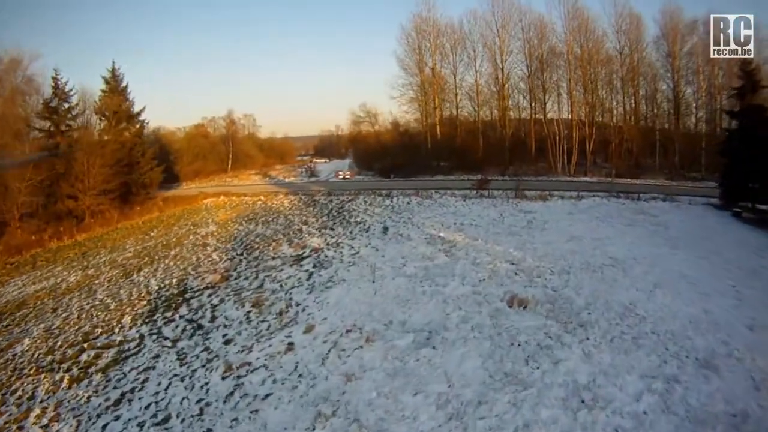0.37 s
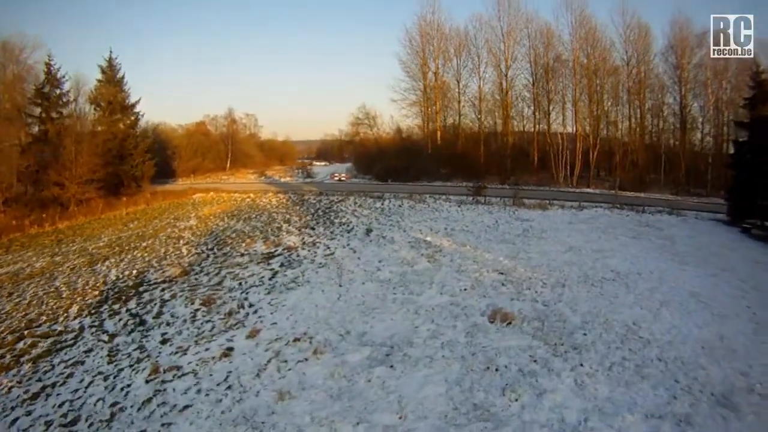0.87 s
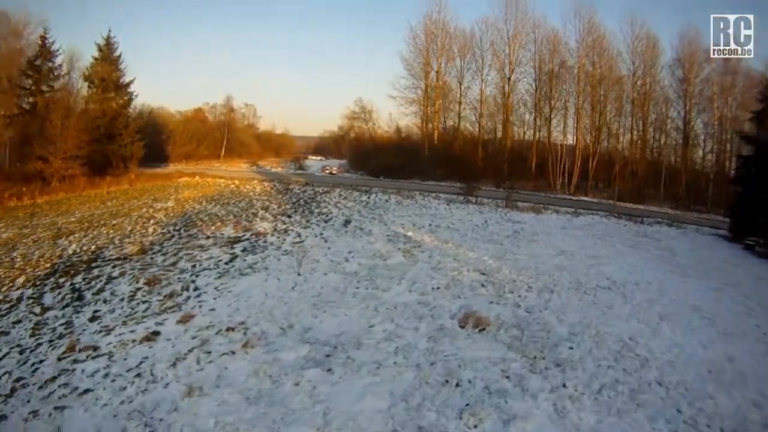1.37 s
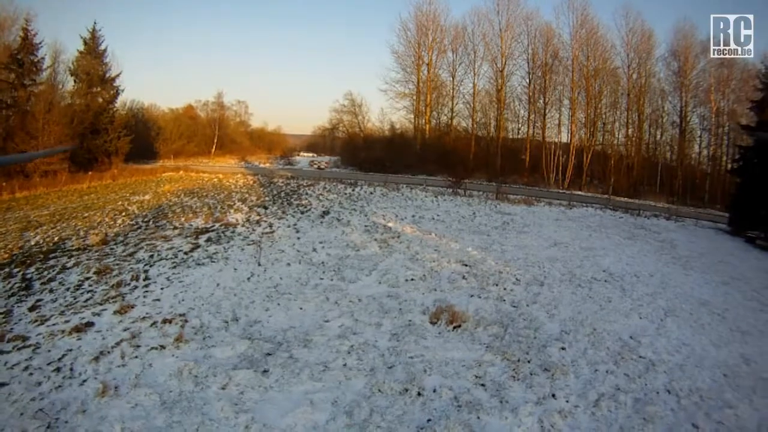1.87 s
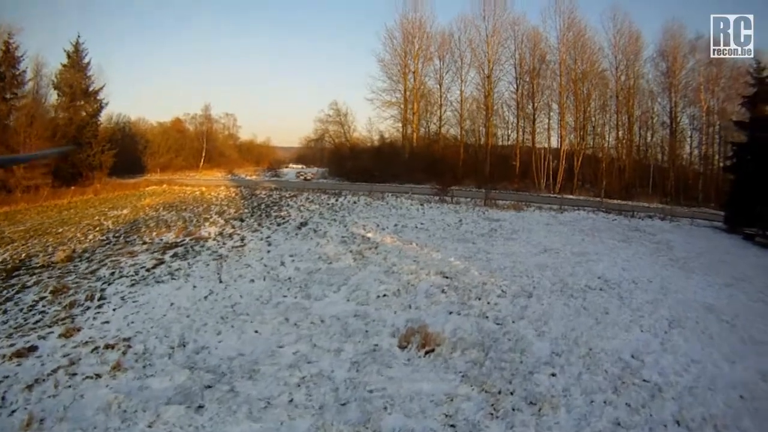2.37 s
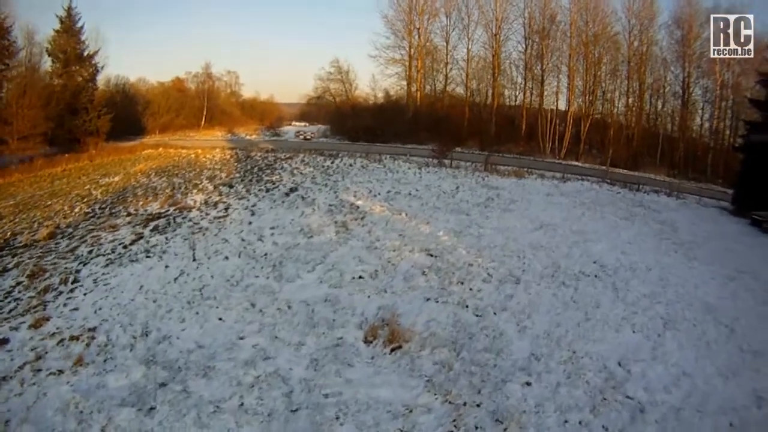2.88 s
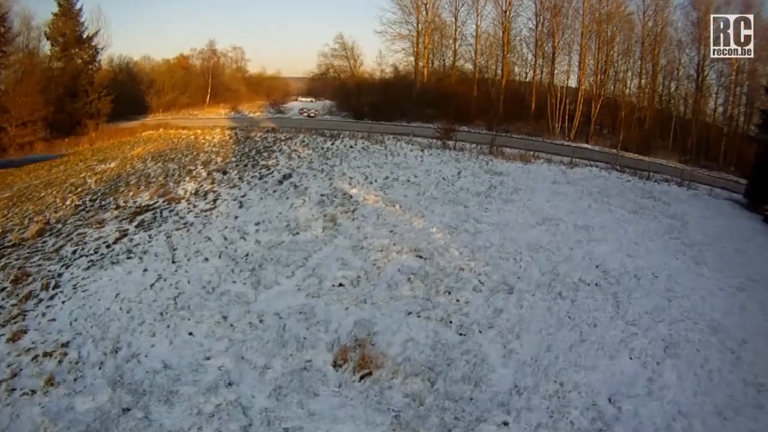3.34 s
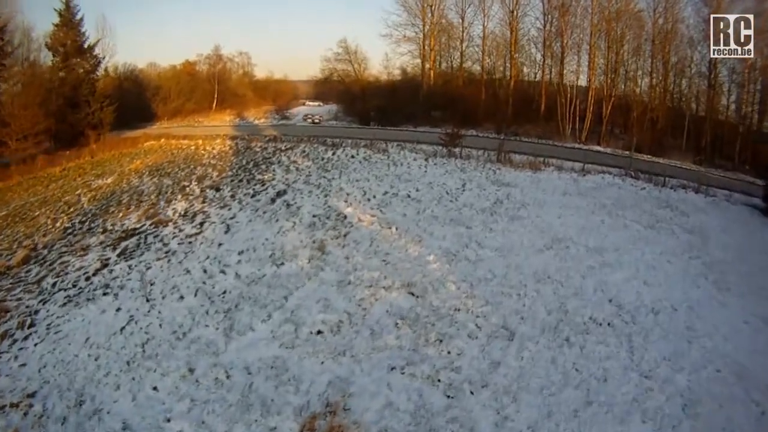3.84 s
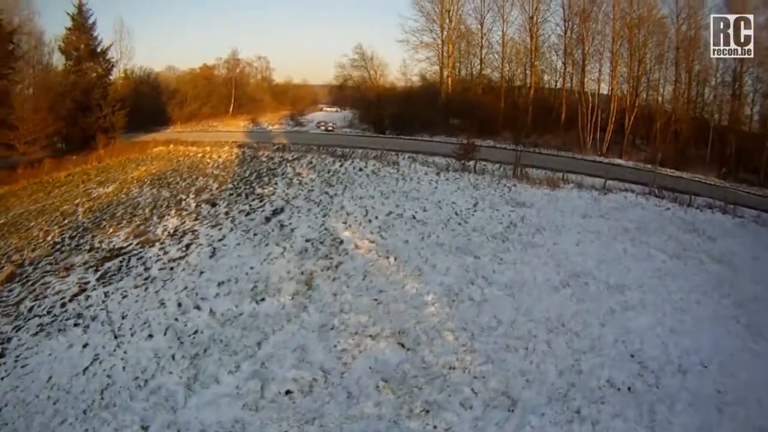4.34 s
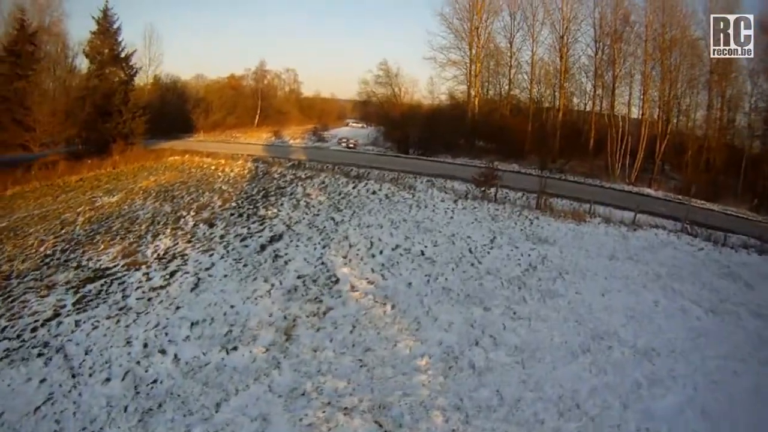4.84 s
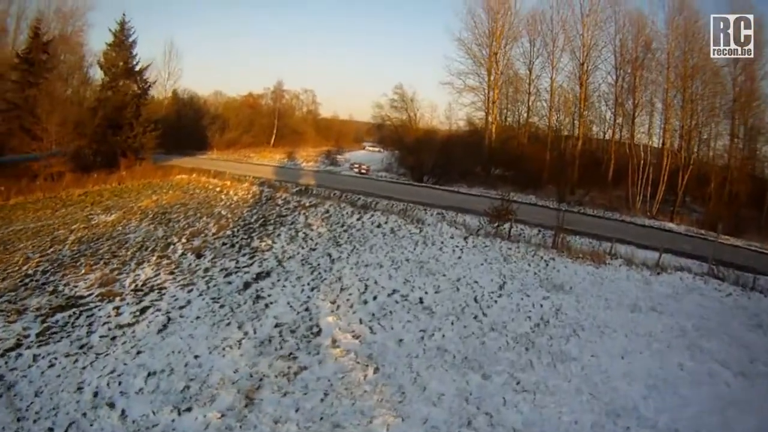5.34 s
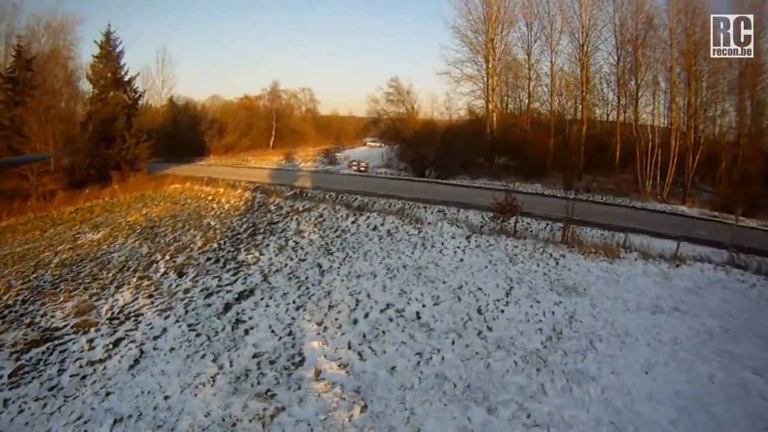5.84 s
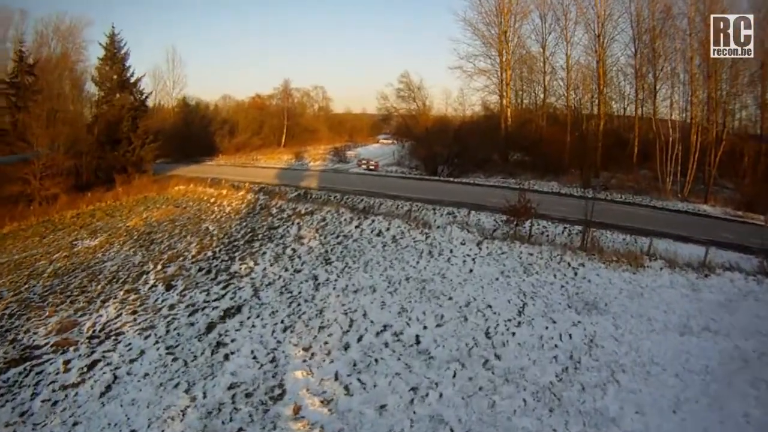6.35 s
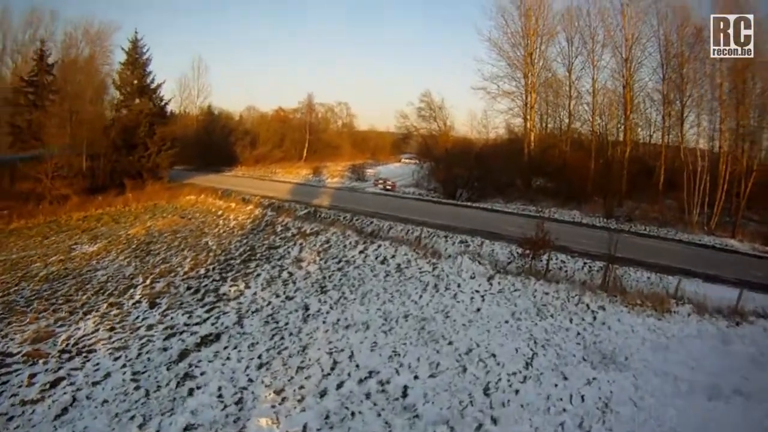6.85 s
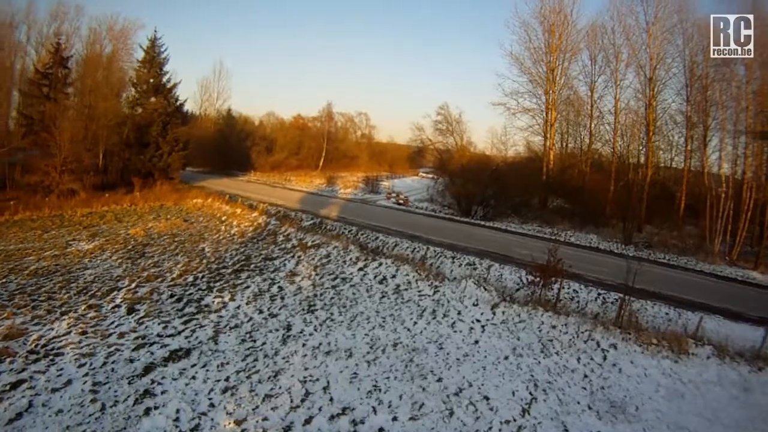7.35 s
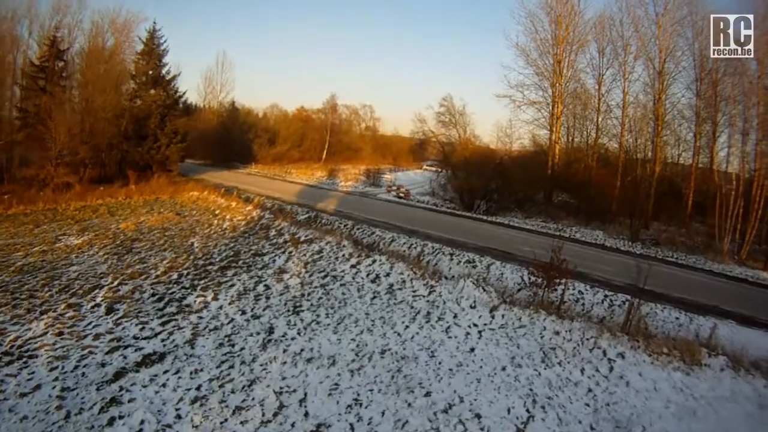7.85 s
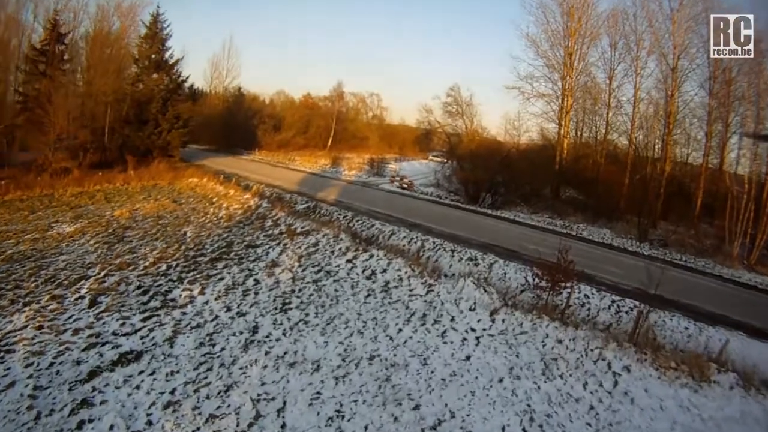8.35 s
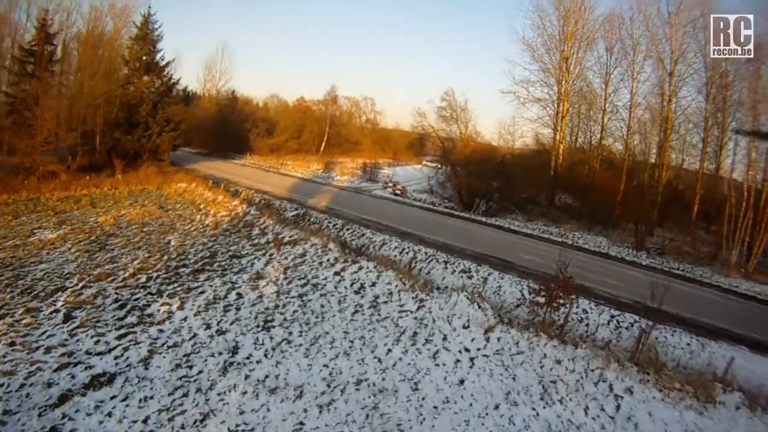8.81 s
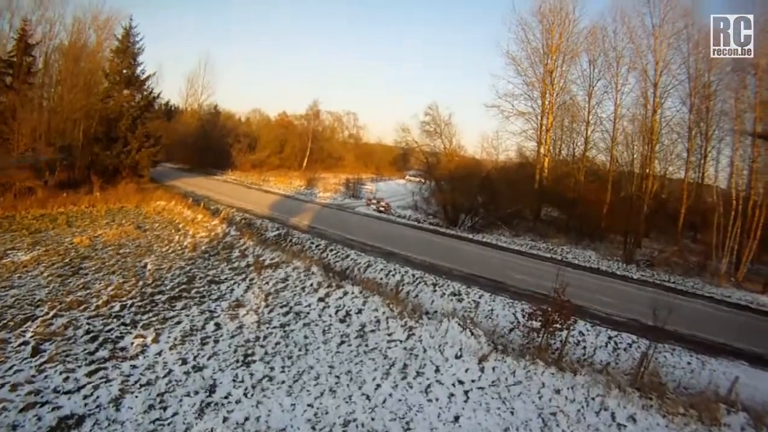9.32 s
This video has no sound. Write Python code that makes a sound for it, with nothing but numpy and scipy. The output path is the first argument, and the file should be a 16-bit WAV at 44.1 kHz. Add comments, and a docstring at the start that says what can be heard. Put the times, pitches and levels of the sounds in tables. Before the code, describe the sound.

A small camera drone flies low over an open snowy field, heard from a microphone on its body. Several propeller motors hum at nearly equal pitches, beating together, with a gritty frame buzz, ticking case rattle and electric whine. Wind thumps and pops between about one and two seconds; pitch climbs, drops near three seconds, then stays nearly level to the end.

```python
"""On the frame of a flying drone, with the microphone of a small camera riding along: three motors at nearly
equal speeds thrum and beat at low shaft orders, and their 14 magnet poles whine. The middle motor
knocks the frame once a turn and the frame rings; the case ticks on the peaks of the shaking. A low rumble
lies beneath, and gusts and pops of wind buffet the microphone. Gain control holds the loud moments down;
the sound is sampled at 12 kHz and held, which mirrors the spectrum upward."""
import sys
import numpy as np
from scipy import signal
from scipy.fft import rfft, irfft
from scipy.io import wavfile
from scipy.ndimage import uniform_filter1d

SR = 44100
rng = np.random.default_rng(int(sys.argv[2]) if len(sys.argv) > 2 else 0)


def file_out(sig):
    """Save sig as 16-bit WAV at sys.argv[1]."""
    # one column per channel
    cols = np.atleast_2d(sig).T
    # limit, then scale
    lim = np.clip(cols, -1, 1)
    pcm = np.round(lim * 32767).astype(np.int16)
    wavfile.write(sys.argv[1], SR, pcm)


def nominal_scale(level):
    """Amplitude ratio for a level in decibels (scalar or array-like)."""
    x = np.asarray(level, float) / 20
    return 10 ** x


N = 427750  # samples


def evened(x):
    """Scales a signal to rms 1."""
    return x / np.sqrt(np.mean(x ** 2) + 1e-20)


def curves(rows):
    """Straight lines between the rows of a table whose first column is time in seconds."""
    time_s, *columns = np.transpose(rows)
    return np.array([np.interp(np.arange(N) / SR, time_s, column) for column in columns])


def slow(top_hz):
    """Slow random wavering of rms 1: chance values joined by lines, 2 * top_hz of them a second."""
    knots = rng.standard_normal(400)
    return evened(np.interp(np.arange(N) / SR * 2 * top_hz, np.arange(400), knots))


def coloured(points):
    """Noise of rms 1 whose spectrum runs through points of (hz, level_db)."""
    points_hz, points_db = np.transpose(points)
    hz = np.fft.rfftfreq(N, 1 / SR)
    gain = nominal_scale(np.interp(np.log(hz + 1), np.log(points_hz), points_db))
    return evened(irfft(rfft(rng.standard_normal(N)) * gain, N))


def ring(x, modes):
    """Parallel resonances of (hz, width_hz, level_db), each applied twice for dark valleys; rms 1."""
    out = 0
    for k, (hz, width_hz, db) in enumerate(modes):
        b, a = signal.iirpeak(hz, hz / (1.57 * width_hz), SR)  # wider, as two passes narrow it
        once = signal.lfilter(b, a, x)
        twice = signal.lfilter(b, a, once)
        out = out + (-1) ** k * nominal_scale(db) * twice
    return evened(out)


def wind():
    """Turbulence on the microphone: lumpy low noise; each gust rises and falls at its own rate."""
    # gusts on the microphone: time_s of the height, level_db, rise_db_per_s, fall_db_per_s
    gust_table = [(0.0, -49, 73, 21), (0.76, -28, 150, 25), (1.0, -25.5, 60, 30), (1.25, -28, 28, 10),
                  (3.62, -38, 80, 120), (4.14, -42, 25, 42)]
    # spectrum of the wind noise: hz, level_db
    wind_spectrum = [(12, -28), (25, -3), (60, -3.5), (130, -1.5), (220, -6.5), (300, -10), (420, -18.5),
                     (600, -29), (900, -59)]
    lumps_db, calm_db = 3, -60
    long_gust, end_s, end_db_per_s = 3, 1.93, 102  # the long gust drops away
    t = np.arange(N) / SR
    gusts_db = np.array([db - np.where(t < s, rise * (s - t), fall * (t - s))
                         for s, db, rise, fall in gust_table])
    gusts_db[long_gust] -= end_db_per_s * np.maximum(t - end_s, 0)
    level_db = np.maximum(gusts_db.max(0), calm_db) + lumps_db * slow(18)
    return nominal_scale(level_db) * coloured(wind_spectrum)


def pops():
    """Single pops of wind: each is one pull and push of the microphone's membrane."""
    # pops: time_s of the middle, level_db of the sine before its envelope
    pop_table = [(0.769, -16), (0.787, -15.5), (0.861, -9.5), (1.089, -14), (1.26, -11.5), (1.327, -16.5),
                 (1.385, -18), (1.408, -10)]
    pop_hz, length_s = 150, 0.003
    t, out = np.arange(N) / SR, np.zeros(N)
    for s, db in pop_table:
        envelope = np.exp(-((t - s) / length_s) ** 2)
        out += nominal_scale(db) * np.sin(2 * np.pi * pop_hz * (t - s)) * envelope
    return out


def rumble():
    """Low coloured noise beneath the motors, unsteady in level."""
    # spectrum of the rumble: hz, level_db
    rumble_spectrum = [(15, -44), (45, -31), (65, -9), (100, -26.5), (140, -2.5), (172, -13.5), (205, -2),
                       (240, -6), (275, -3.5), (325, -21), (600, -20.5), (1000, -40)]
    level_db, waver_db = -37.5, 2.5
    return nominal_scale(level_db + waver_db * slow(6)) * coloured(rumble_spectrum)


def case(thrum):
    """The loose case ticks when a peak of the shaking closes its gap, and chatters as the shaking swells."""
    # resonances of the case: hz, width_hz, level_db
    case_modes = [(3520, 140, 0.5), (4650, 630, 4)]
    gap, tick_s = 0.57, 0.00053  # gap in rms of the thrum, decay time of a tick
    scatter_db, chatter_db = 3.3, -5
    shaking = evened(thrum)
    at = signal.find_peaks(shaking, height=gap)[0]
    ticks = np.zeros(N)
    ticks[at] = np.sqrt(shaking[at] - gap) * nominal_scale(scatter_db * rng.standard_normal(len(at)))
    decay = signal.lfilter([1], [1, -np.exp(-1 / (tick_s * SR))], ticks)
    bursts = decay * rng.standard_normal(N)
    swell = uniform_filter1d(abs(thrum), size=2000) ** 1.5
    chatter = evened(swell * rng.standard_normal(N))
    return ring(evened(bursts) + nominal_scale(chatter_db) * chatter, case_modes)


def frame(turns, knock_db):
    """The middle motor knocks once a turn and its bearing noise swells with the knock; the frame rings."""
    # how the frame rings: hz, width_hz, level_db
    frame_modes = [(939, 282, -12.5), (1390, 312, -10), (2030, 178.6, 1.5), (2112, 270, -4),
                   (2411, 266, -7), (3010, 423, -18), (3644, 250, -29)]
    # harmonics of the once-a-turn knock: shaft order, level_db
    knock_orders = [(15, -2), (16, -16), (18, -7), (19, -8.5), (20, -13), (21, -11), (22, -6), (28, -2),
                    (29, 0), (30, -2.5), (31, 1.5), (32, -2), (33, -1), (34, -7), (35, 0.5), (36, -5.5),
                    (37, -1)]
    lag_turns, scatter_turns, swell_depth = 0.45, 0.0033, 0.34
    dead_hz, dead_width_hz = 3320, 330  # where the frame is dead
    angle = turns[1] - lag_turns + scatter_turns * slow(20)  # the knock comes a little early or late
    knocks = 0
    for order, db in knock_orders:
        drift = 1 + slow(12) + 1j * slow(12)  # each order comes and goes
        knocks = knocks + nominal_scale(db) * (drift * np.exp(2j * np.pi * order * angle)).real
    swell = 1 + swell_depth * np.cos(2 * np.pi * angle)
    bearing = evened(swell * nominal_scale(0.78 * slow(16)) * rng.standard_normal(N))
    rung = ring(nominal_scale(knock_db) * evened(knocks) + bearing, frame_modes)
    return signal.lfilter(*signal.iirnotch(dead_hz, dead_hz / dead_width_hz, SR), rung)


def buzz(turns, thrum):
    """The vibrating frame, with the case rattling against it."""
    # vibration: time_s, level_db of the frame, knock_db against the bearing noise
    vibration_db, knock_db = curves([(0.0, -27, -14.5), (1.5, -30, -16.5), (2.05, -26.5, -13.5),
                                     (2.55, -27.5, -13.5), (3.0, -27, -11.5), (3.3, -28, -10),
                                     (4.3, -28.5, -13), (5.5, -28, -14), (6.5, -27.5, -12),
                                     (7.7, -28.5, -12.5), (8.0, -26.5, -11), (9.7, -28.5, -9)])
    waver_db, case_db, beat_db = 1.0, -28, 2.5
    # the case rattles harder when the slow and fast unbalance push together
    beat = np.cos(2 * np.pi * (turns[2] - turns[0] + 0.21))
    rattle = nominal_scale(case_db + beat_db * beat) * case(thrum)
    return nominal_scale(vibration_db + waver_db * slow(10)) * (frame(turns, knock_db) + rattle)


def hunting(swing):
    """The speed controller overshoots back and forth at an uneven rate and jitters; swing in turns a second."""
    swings_per_s, rate_scatter = 2.8, 0.3
    rate = swings_per_s * (1 + rate_scatter * slow(2))
    wave = np.sin(2 * np.pi * (np.cumsum(rate) / SR + rng.random()))
    return swing * ((1 + 0.3 * slow(1)) * wave + 0.4 * slow(6))


def motors():
    """Speeds (turns a second) and shaft angles (turns) of the slow, middle and fast motor."""
    # mean motor speeds: time_s, slow_turns_per_s, middle_turns_per_s, fast_turns_per_s
    speed_table = [(0.0, 63.0, 66.1, 70.1), (0.7, 63.2, 66.6, 70.2), (0.9, 65.0, 68.1, 71.6),
                   (1.2, 66.5, 70.3, 73.2), (1.45, 66.8, 70.8, 74.1), (1.6, 69.8, 73.9, 76.3),
                   (1.9, 70.2, 73.4, 77.4), (2.2, 70.1, 72.8, 78.3), (2.32, 73.2, 75.0, 80.5),
                   (2.6, 72.8, 75.1, 81.2), (2.75, 71.2, 73.3, 79.5), (2.95, 69.7, 72.2, 76.0),
                   (3.1, 66.0, 68.5, 73.4), (3.25, 66.2, 68.5, 71.8), (3.7, 66.4, 68.6, 73.1),
                   (4.65, 66.3, 68.5, 73.7), (5.0, 66.0, 68.6, 73.0), (5.2, 65.2, 67.7, 72.6),
                   (5.95, 64.8, 67.8, 72.5), (6.05, 65.8, 67.6, 72.1), (6.5, 65.4, 67.7, 72.1),
                   (7.1, 65.5, 68.5, 72.7), (7.8, 65.8, 68.8, 73.1), (7.9, 67.5, 69.7, 73.6),
                   (8.2, 67.4, 69.7, 74.3), (8.8, 67.7, 69.7, 73.6), (9.15, 66.5, 68.0, 72.8),
                   (9.7, 66.7, 67.9, 73.3)]
    # shaft angles at the start: slow, middle and fast motor [turns]
    start_turns = [.25, .0, -.27]
    swings = [0.42, 0.3, 0.25]  # turns a second
    speeds = curves(speed_table) + np.array([hunting(swing) for swing in swings])
    return speeds, np.cumsum(speeds, axis=1) / SR + np.array(start_turns)[:, None]


def strengths(speeds):
    """Rows in dB: slow thrum; slow whine, middle whine, fast unbalance by shaft speed; middle, fast thrum."""
    # strengths that peak at one shaft speed, rows slow whine, middle whine, unbalance of the fast propeller:
    # motor (0 slow, 1 middle, 2 fast), peak_turns_per_s, half_width_turns_per_s, peak_level_db
    peak_table = [(0, 70.7, 2.25, -33.5), (1, 68.8, 2.2, -37.5), (2, 80.0, 4.8, -34)]
    # thrum of each motor: time_s, slow_level_db, middle_level_db, fast_level_db
    thrum_db = curves([(0.0, -29.5, -56.5, -34.5), (0.3, -30, -35, -33.5), (0.7, -31, -38, -34.5),
                       (1.5, -36, -40, -33.5), (1.8, -35, -39, -33.5), (2.5, -39, -33, -33),
                       (3.0, -37.5, -48.5, -36), (3.5, -35.5, -30, -35.5), (4.6, -31.5, -32, -35.5),
                       (5.3, -31.5, -35, -36), (5.8, -32, -41.5, -34.5), (6.75, -31.5, -42, -34.5),
                       (7.0, -34, -35.5, -35.5), (7.75, -34.5, -34.5, -35.5), (8.2, -33.5, -44, -35.5),
                       (8.5, -34, -33, -40), (9.2, -33.5, -36, -38.5), (9.7, -38.5, -34.5, -36)])
    peaked_db = [db - 10 * np.log10(1 + ((speeds[motor] - top) / width) ** 2)
                 for motor, top, width, db in peak_table]
    return np.vstack([thrum_db[:1], peaked_db, thrum_db[1:]])


def tones(turns, speeds):
    """Shaft orders and their sums as sines; returns the low thrum and the whine above order 10."""
    # tones: (multiples of the slow, middle and fast shaft), row of strengths(),
    # level_db against that row, waver_db
    tone_table = [((4, 0, 0), 0, 0, 1.3), ((3, 0, 0), 5, -7, 1.8), ((14, 0, 0), 1, 0, 1), ((13, 0, 0),
                  1, -9.5, 1), ((33, 0, 0), 0, -25, 2.8), ((0, 3, 0), 4, 0, 2), ((0, 1, 0), 3, -8.5, 1.6),
                  ((0, 2, 0), 5, -5.5, 1.5), ((0, 4, 0), 0, -13.5, 1.6), ((0, 14, 0), 2, 0, 0.41),
                  ((0, 0, 1), 3, -0.72, 0.89), ((0, 0, 2), 5, 0, 1), ((0, 0, 3), 5, 1, 1.1), ((2, 0, 1),
                  5, -5.5, 2.4), ((2, 2, 0), 0, -7.5, 1.5), ((2, 0, 2), 0, -11.5, 1.5), ((0, 2, 1),
                  5, -13, 0.81), ((0, 1, 2), 5, -13.5, 1.9), ((2, 1, 0), 5, -14, 1.4), ((0, 5, 0),
                  0, -24, 3), ((6, 0, 0), 0, -26.5, 2.6), ((8, 0, 0), 0, -27, 3), ((0, 8, 0), 0, -26.5, 3),
                  ((5, 0, 0), 0, -23, 3), ((0, 0, 5), 0, -22, 3), ((0, 0, 6), 0, -25, 3)]
    strength_db = strengths(speeds)
    thrum, whine = np.zeros(N), np.zeros(N)
    for orders, row, db, waver_db in tone_table:
        wave = np.sqrt(2) * np.cos(2 * np.pi * np.dot(orders, turns))
        part = whine if sum(orders) > 10 else thrum
        part += nominal_scale(strength_db[row] + db + waver_db * slow(8)) * wave
    return thrum, whine


def dips():
    """Gain of brief bell-shaped dips in the level of the drone."""
    # dips: time_s of the middle, depth_db (negative lifts the level)
    dip_table = [(4.27, 2.5), (5.08, 3.5), (5.48, 4.5), (6.0, -1), (7.05, 5.5)]
    dip_s = 0.02
    t = np.arange(N) / SR
    depth_db = sum(db * np.exp(-((t - s) / dip_s) ** 2) for s, db in dip_table)
    return 1 / nominal_scale(depth_db)


def scene():
    """The drone with its brief dips, and the wind on the microphone."""
    speeds, turns = motors()
    thrum, whine = tones(turns, speeds)
    drone = thrum + whine + buzz(turns, thrum) + rumble()
    return (drone * dips() + wind() + pops())[None]


def gain_control(x):
    """Loud moments pull the gain down some milliseconds late; it climbs back steadily."""
    knee_db, back_db_per_s = -22.0, 45
    late_samples = 400
    power_db = 10 * np.log10(abs(uniform_filter1d(x ** 2, size=500)) + 1e-12)
    climb_db = np.arange(N) * back_db_per_s / SR
    held_db = np.maximum.accumulate(power_db + climb_db, axis=1) - climb_db  # peaks, sinking steadily
    over_db = np.maximum(held_db - knee_db, 0)
    late_db = np.pad(over_db, ((0, 0), (late_samples, 0)))[:, :N]
    return x / nominal_scale(uniform_filter1d(late_db, size=200))


def lowpass(x, cutoff_hz, taps):
    """Linear-phase low-pass filter without delay."""
    return signal.oaconvolve(x, signal.firwin(taps, cutoff_hz, fs=SR)[None], "same")


def sample_and_hold(x):
    """Samples at 12 kHz, each repeated four times: the spectrum mirrors about 6 and 12 kHz."""
    sampled = signal.resample_poly(x, 40, 147, axis=1)  # 44.1 to 12 kHz
    held = np.repeat(sampled, 4, axis=1)  # 48 kHz
    back = signal.resample_poly(held, 147, 160, axis=1)[:, :N]  # 48 to 44.1 kHz
    return np.pad(back, ((0, 0), (0, N - back.shape[1])))


def roll_off(x):
    """The treble ends steeply here."""
    return signal.sosfilt(signal.butter(12, 15810, fs=SR, output="sos"), x)


def record(dry):
    """Gain control, then sampling at 12 kHz with held samples, between two low-pass filters."""
    controlled = gain_control(dry)
    held = sample_and_hold(lowpass(controlled, cutoff_hz=5964, taps=101))
    mix = lowpass(held, cutoff_hz=15150, taps=255)
    return roll_off(mix)


dry = scene()
out = record(dry)
file_out(out)
```